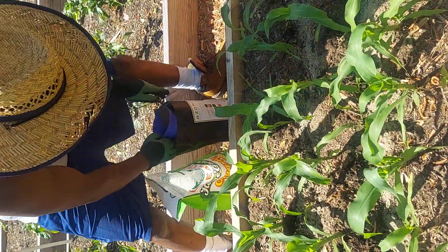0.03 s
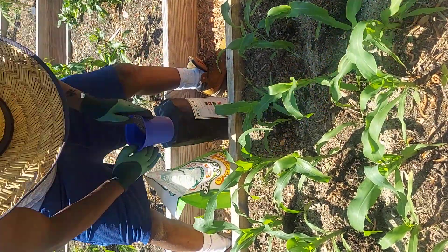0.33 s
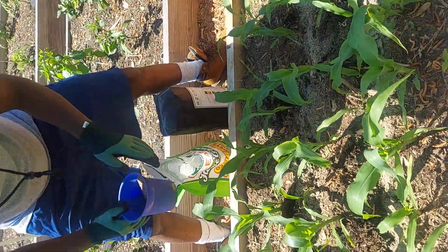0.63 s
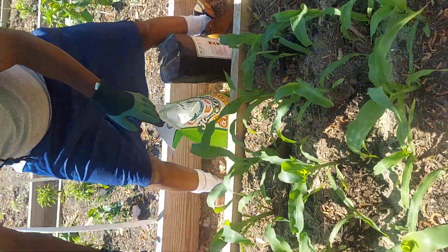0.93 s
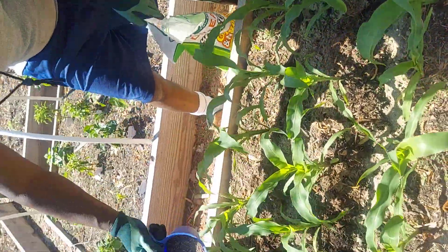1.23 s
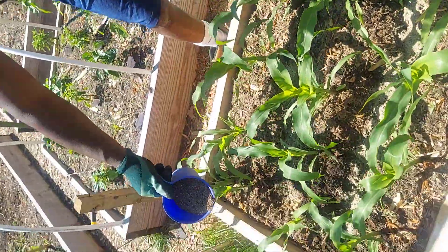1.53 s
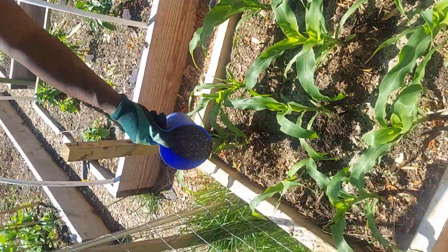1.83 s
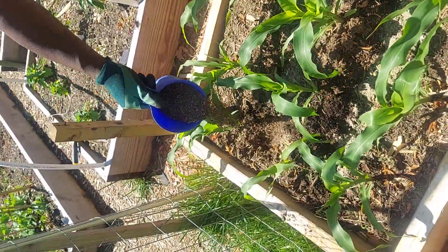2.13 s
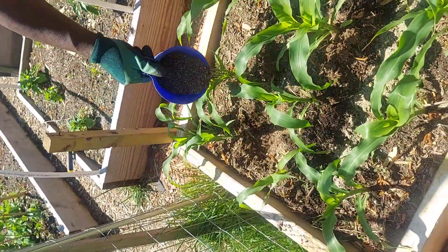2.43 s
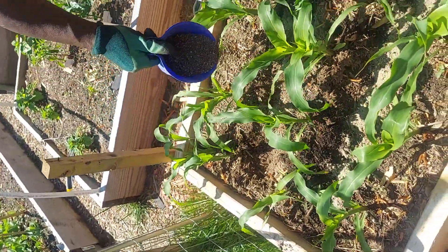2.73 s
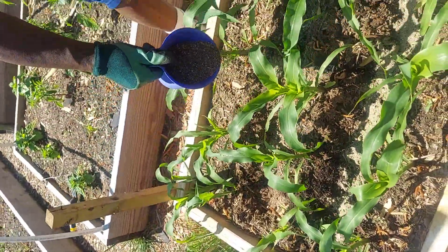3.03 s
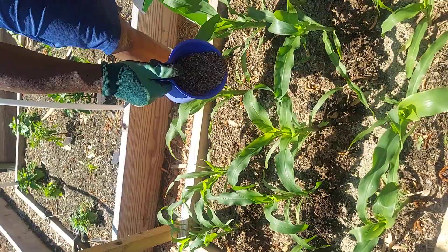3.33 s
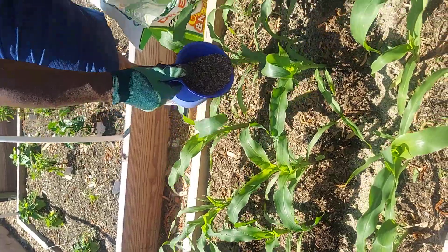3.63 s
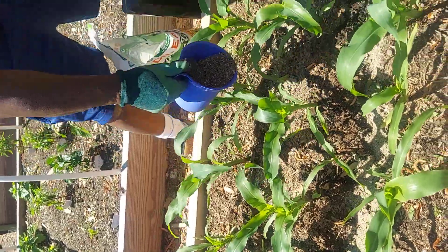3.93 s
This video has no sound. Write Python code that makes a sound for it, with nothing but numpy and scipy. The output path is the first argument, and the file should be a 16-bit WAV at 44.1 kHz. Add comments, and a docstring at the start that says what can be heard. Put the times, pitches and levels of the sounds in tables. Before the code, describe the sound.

Fertiliser granules are scooped with a plastic pot that knocks, then, after a few dull steps, shaken over soil and leaves in short hissing spills. Outdoors, wind buffets the microphone, a distant machine hums and birds chirp faintly.

```python
"""First a gardener scoops fertiliser granules from a bag: a plastic pot slides through them and knocks.
At about 1 s come dull steps along a raised bed, while loose granules shift in the carried pot.
From about 1.8 s the pot is shaken over soil and leaves: the granules slide out in short hissing spills,
and single ones tick on the leaves. Small birds chirp far off from 1.2 s to just after 3 s.
All the while a distant machine hums and wind buffets the microphone's two openings, its ports."""
import sys
import numpy as np
from scipy import signal
from scipy.fft import rfft, irfft
from scipy.io import wavfile
from scipy.ndimage import map_coordinates

SR = 44100
rng = np.random.default_rng(int(sys.argv[2]) if len(sys.argv) > 2 else 0)


def to_wav(sig):
    """Store sig (one row per channel, or 1-D mono) as 16-bit WAV at the path in sys.argv[1].

    Samples outside -1..1 are clipped; the rate is SR.
    """
    pcm = np.clip(np.atleast_2d(sig), -1, 1) * 32767
    pcm = np.round(pcm).astype(np.int16)
    wavfile.write(sys.argv[1], SR, pcm.T)  # frames by channels


N = 176400
T = np.arange(N) / SR
FREQS = np.maximum(np.arange(N // 2 + 1) * SR / N, 1)  # the frequencies of a spectrum, in Hz
SIDES = np.array([[1], [-1]])  # pushes left and right in opposite directions


def from_db(db):
    """Turn decibels into a number to multiply by."""
    return 10 ** (np.asarray(db) / 20)


def unit_power(x):
    """Scale a sound so that its average power is 1."""
    return x / np.sqrt(np.mean(x ** 2) + 1e-20)


def level(rows):
    """Join rows of seconds and dB into a volume curve."""
    return from_db(np.interp(T, *np.transpose(rows)))


def at_hz(rows):
    """Read a table at every frequency, giving each octave equal room."""
    hz, values = np.transpose(rows)
    return np.interp(np.log(FREQS), np.log(hz), values)


def pan(db):
    """Left and right volumes. Pan is how many dB louder the left side is."""
    return from_db(SIDES * db / 2)


def white():
    """Two unrelated hisses."""
    return rng.standard_normal((2, N))


def drift(rate_hz):
    """A smooth random wobble, about 1 in size."""
    step, warm_up = 40, 2000
    r = np.exp(-2 * np.pi * rate_hz * step / SR)
    noise = rng.standard_normal(N // step + warm_up + 2)
    slow = signal.lfilter([1], [1, -2 * r, r * r], noise)[warm_up:]
    return np.interp(np.arange(N) / step, np.arange(len(slow)), unit_power(slow))


def colour(x, spectrum, likeness=((1, 0),), balance=((1, 0),)):
    """Shape two unrelated noises into stereo: their tone, how alike the sides are, and their pan."""
    low_cut = 1 + (spectrum[0][0] / FREQS) ** 8
    high_cut = 1 + (FREQS / spectrum[-1][0] / 1.3) ** 8
    gain = from_db(at_hz(spectrum)) / np.sqrt(low_cut * high_cut)
    alike = at_hz(likeness)
    mid, side = rfft(x) * gain
    stereo = np.sqrt(1 + alike) * mid + np.sqrt(1 - alike) * side * SIDES
    return unit_power(irfft(stereo * pan(at_hz(balance)), N))


def envelope(start, attack, hold, release):
    """A volume curve that rises in a straight line and dies away from `hold` seconds after the start."""
    rise = np.clip((T - start) / attack, 0, 1)
    return rise * np.exp(-np.clip((T - start - hold) / release, 0, 40))


def resonate(x, hz, width_hz):
    """Make a noise ring around one pitch."""
    r = np.exp(-np.pi * width_hz / SR)
    return unit_power(signal.lfilter([1, 0, -1], [1, -2 * r * np.cos(2 * np.pi * hz / SR), r * r], x))


def even(x):
    """Even out the loudness of a noise so that it has fewer deep dips."""
    wave = signal.hilbert(x)
    return unit_power(wave.real / np.sqrt(np.abs(wave) ** 2 + .2))


# The tone of the open air. Each row: frequency in Hz, relative strength in dB.
AIR_TONE = [(50, -2), (65, -0.5), (125, -6.5), (165, -7), (190, -15.5), (245, -12), (320, -20),
            (440, -18.5), (620, -21), (800, -24), (1000, -22.5), (1600, -27), (3000, -32), (5000, -38.5),
            (6200, -45.5), (8500, -46.5), (10000, -53), (13000, -49), (15600, -70)]
# How alike the sides are. Each row: frequency in Hz, likeness (1 same, 0 unrelated, -1 opposite).
AIR_LIKENESS = [(100, 0.56), (300, 0.57), (650, 0.56), (1300, -0.28), (2500, -0.18), (5000, -0.085),
                (12000, -0.084)]
# Which way the air's sound leans. Each row: frequency in Hz, pan in dB.
AIR_PAN = [(200, 0), (1200, 0.5), (2800, -4), (5000, 2), (9000, 4), (13000, -8)]
def outdoor_air():
    """Distant outdoor sounds blend into a soft, steady wash."""
    return from_db(-39) * colour(white(), AIR_TONE, AIR_LIKENESS, AIR_PAN)


# The notes in the hum. Each row: pitch in Hz, base level in dB.
HUM_NOTES = [(123.6, -40), (154, -42.5), (245.5, -52), (276, -75), (489, -61), (593, -66.5)]
# The hum swells and sinks. Each row: time in seconds, change of level in dB.
HUM_SWELL = [(0, 2.5), (.27, -4.5), (.45, 1), (1.1, -2), (1.3, 2), (1.6, -7.5), (1.9, 2), (2.4, -1),
             (3.4, 0), (4, -1)]
def machine():
    """A far machine hums a few low notes, each wavering in pitch and loudness."""
    out = 0
    for hz, db in HUM_NOTES:
        phase = 2 * np.pi * hz * T + 0.78 * drift(2) + 0.085 * drift(0.33) * SIDES
        waver_db = 3 * drift(3.4)
        out += np.sqrt(2) * level(HUM_SWELL) * from_db(db + waver_db) * np.sin(phase)
    return out


# Bird calls. Each row: start and length in seconds, first and last pitch in Hz, relative level in dB.
CHIRPS = [(1.236, 0.28, 3720, 3520, -67), (1.486, 0.058, 3350, 3710, -66), (1.53, 0.06, 3150, 3180, -66),
          (1.99, .04, 2950, 2470, -61.5), (2.143, 0.057, 4290, 3480, -62.5), (2.227, .06, 3730, 2730, -63),
          (2.472, 0.058, 2800, 2724, -58), (2.745, .04, 2650, 2380, -61), (2.89, .035, 2650, 2360, -67),
          (2.599, 0.027, 5170, 4780, -60), (2.625, 0.023, 5180, 4920, -64), (2.697, 0.042, 4560, 3610, -61),
          (2.861, 0.025, 2910, 2890, -60), (2.99, 0.017, 4530, 4660, -62), (3.045, 0.039, 3020, 2650, -62),
          (3.087, 0.026, 3740, 3570, -64)]
def birds():
    """Far birds whistle short sliding notes, blurred by scattered echoes."""
    song, warble_hz = 0, 90 * drift(70)
    for start, length, first_hz, last_hz, db in CHIRPS:
        progress = np.clip((T - start) / length, 0, 1)
        hz = first_hz + (last_hz - first_hz) * progress + warble_hz
        song += from_db(db) * np.sin(np.pi * progress) * np.sin(2 * np.pi * np.cumsum(hz) / SR)
    fade_s = 0.055
    tail = white()[:, :SR // 2] * np.exp(-T[:SR // 2] / fade_s) / np.sqrt(fade_s * SR / 2)
    echoes = signal.fftconvolve(song[None], tail, axes=1)[:, :N]
    return pan(-3) * (from_db(6) * song + from_db(8) * echoes)


# Puffs of wind. Each row: middle in seconds, peak level in dB, width in seconds, pitch in Hz,
# port (0 left, 1 right).
BUFFETS = [(0.059, -40, 0.15, 124, 0), (0.834, -25, 0.03, 107.4, 0), (0.878, -19.5, 0.022, 75, 0),
           (0.952, -17, 0.015, 109, 0), (.951, -30.5, 0.0079, 270, 0), (1.421, -16, 0.0098, 113, 0),
           (1.822, -30, 0.026, 99, 0), (2.0, -19, 0.022, 85, 0), (2.036, -24, .024, 129, 0),
           (2.016, -22.5, 0.067, 93.8, 1), (2.107, -23, 0.018, 70, 0), (2.203, -19, 0.01, 91, 1),
           (2.171, -33, 0.01, 198, 1), (2.23, -27, 0.015, 168, 0), (2.314, -30, 0.053, 76.5, 1),
           (2.459, -29.5, 0.0135, 209, 1), (2.471, -24.5, 0.032, 111, 1), (2.643, -23, 0.02, 110, 0),
           (2.644, -19.5, 0.014, 124, 1), (2.766, -30.5, 0.062, 81.3, 0), (2.86, -28, 0.021, 100, 1),
           (2.879, -16, 0.013, 130, 0), (2.929, -18.5, 0.012, 103, 0), (3.006, -25.5, 0.05, 89, 0),
           (3.036, -31.5, 0.019, 179, 1), (3.057, -21.5, 0.025, 118.6, 1), (3.189, -22, 0.016, 113, 1),
           (3.229, -16.5, 0.012, 117, 1), (3.24, -18, 0.01, 184, 1), (3.247, -30.5, 0.088, 58, 1),
           (3.37, -27, 0.031, 106, 0), (3.635, -30.5, 0.04, 122, 0), (3.652, -26.5, 0.028, 98, 1)]
# The breeze rises and falls. Each row: time in seconds, level in dB.
BREEZE_LEVEL = [(0, -34.5), (.3, -44.5), (.7, -43.5), (.88, -33), (1.1, -39), (1.6, -40.5), (1.85, -40.5),
                (2.05, -32), (2.5, -33), (3.2, -33), (3.5, -41.5), (3.8, -36), (4, -41)]
# The tone of its rumble. Each row: frequency in Hz, relative strength in dB.
BREEZE_TONE = [(33, -19), (42, -11.5), (54, 1.5), (85, 0), (140, -7.5), (220, -21), (400, -40)]
def wind():
    """A breeze rumbles, and brief swirls of air each shake one port for a few uneven swings."""
    swirls, wander = np.zeros((2, N)), 1.01 * drift(32.9)
    for middle, db, width, hz, port in BUFFETS:
        near = np.abs(T - middle) < 3 * width
        t = T[near] - middle
        swing = np.sqrt(2) * np.sin(2 * np.pi * (hz * t + rng.random()) + wander[near])
        swell = np.exp(-2 * np.log(2) * (t / width) ** 2)
        swirls[port, near] += from_db(db) * swell * swing
    rumble = colour(white(), BREEZE_TONE, likeness=[(50, 0.077), (200, 0.15)])
    return swirls + level(BREEZE_LEVEL) * rumble


# Dull bumps. Each row: start in seconds, crunch level in dB, fade in seconds, thud pitch in Hz,
# dB by which the thud is louder than the crunch.
KNOCKS = [(.252, -41, .0075, 470, -0.5), (.258, -33, 0.0042, 546, -2.5), (0.274, -46, 0.015, 560, -8),
          (0.286, -45.5, 0.02, 516, 1.5), (0.954, -55, 0.0052, 406, 11.5), (0.975, -56.5, 0.011, 483, 10),
          (1.202, -39, 0.0099, 453, 1.5)]
# The tone of the crunch. Each row: frequency in Hz, relative strength in dB.
CRUNCH_TONE = [(400, 2), (620, 5.5), (850, -12), (1100, 2.5), (1500, -1.5), (2800, -3), (4500, -15),
               (7000, -33)]
def knocks_and_steps():
    """The pot bumps the bag and feet land: each is a crunch over a hollow thud that dies fast."""
    crunch = even(colour(white(), CRUNCH_TONE, likeness=[(600, 0.81), (3000, 0.29)]))
    out, noise, rise_s = 0, white()[0], 0.00074
    for start, db, fade, hz, thud_db in KNOCKS:
        ring = even(resonate(noise, hz, width_hz=57))
        thud = from_db(thud_db) * ring * envelope(start, 2 * rise_s, fade, fade)
        out += from_db(db) * (thud + crunch * envelope(start, rise_s, 2 * rise_s, fade))
    return out


# Single granules landing. Each row: start in seconds, level in dB, ring pitch in Hz, pan in dB.
TICKS = [(.05, -47, 2700, -19), (.47, -55.5, 7000, 2), (.865, -54, 13000, 3), (1.012, -59, 12500, 5),
         (1.07, -59, 12500, 3), (1.185, -49, 4000, -2), (1.335, -37.5, 4770, 0.5), (1.457, -45, 4350, 4),
         (1.767, -39, 7100, 1), (1.83, -54, 12900, 5), (2.271, -49, 7440, 3), (2.368, -42.5, 4900, 0),
         (2.397, -36, 12500, -4), (2.429, -40, 8000, 3), (2.451, -41, 10400, -1), (2.609, -50, 13000, 6),
         (3.529, -49, 8000, -3), (3.627, -47, 7500, -2), (3.681, -46, 5500, -7), (3.761, -31, 11900, -4),
         (3.774, -43.5, 2200, 3), (3.793, -45, 5000, -4), (3.842, -43, 8300, 1), (3.924, -44, 10900, -8)]
# The tone of their crack. Each row: frequency in Hz, relative strength in dB.
CRACK_TONE = [(2000, 4), (5000, 12.5), (8000, -16), (13000, 8), (15600, -11)]
def ticks():
    """A granule hits a leaf or the pot with a tiny crack and a brief ring."""
    out, noise, crack = 0, white(), colour(white(), CRACK_TONE)
    for start, db, hz, pan_db in TICKS:
        hit = resonate(noise, hz, width_hz=1140) + from_db(-5) * crack
        shape = envelope(start, attack=0.0015, hold=0.0015, release=0.0024)
        out += from_db(db) * pan(pan_db) * shape * hit
    return out


def grains(per_s, spread_db):
    """Tiny random hits in clumps, many weak and a few strong, scattered by leaves on their way."""
    big_per_s, big_db, direct_share, scatter_step_hz = 160, 9.5, 0.86, 663
    size_db = spread_db * np.minimum(rng.exponential(1, N), 4)
    clump_db = 0.45 * drift(55)
    small, big = rng.random((2, N)) < np.array([[per_s], [big_per_s]]) / SR
    hits = small * from_db(size_db + clump_db) + big * from_db(big_db)
    clicks = hits * rng.choice([-1, 1], (3, N))  # one direct copy, and a scattered one for each side
    # Each frequency reaches the two ports a little out of step.
    phase = np.interp(FREQS / scatter_step_hz, np.arange(64), rng.standard_normal(64))
    direct = irfft(rfft(clicks[0]) * np.exp(.5j * phase * SIDES), N)
    return np.sqrt(direct_share) * direct + np.sqrt(1 - direct_share) * clicks[1:]


# Which way the granules' hiss leans. Each row: frequency in Hz, pan in dB.
SHOWER_PAN = [(3000, -5), (5000, -3), (9000, 3), (13000, 1.5)]
def shower(tone, per_s, spread_db):
    """Thousands of hits merge into a hiss with the tone of whatever they strike."""
    left, right = grains(per_s, spread_db)
    return colour(np.array([left + right, left - right]), tone, balance=SHOWER_PAN)


# How far the pot's sound is out of step. Each row: frequency in Hz, the left port's lead in radians.
PORT_PHASE = [(3000, -.7), (5000, 0), (7000, -0.5), (9000, -.9), (10000, 1), (11400, -0.5), (12200, 3.5),
              (13500, 3.5), (14500, 4.5), (15800, 10)]
# The pot's direction. Each row: time in seconds, extra delay at the left port in seconds.
POT_LAG = [(0, -1.15e-4), (.35, -1.15e-4), (1.85, -1.4e-5), (2.35, 0), (2.85, 4e-6), (3.2, 3.4e-5),
           (4, 3.3e-5)]
def from_pot(x):
    """The pot's sound reaches one port a moment before the other, depending on where the pot is."""
    left, right = irfft(rfft(x) * np.exp(.5j * at_hz(PORT_PHASE) * SIDES), N)
    lag = np.interp(T, *np.transpose(POT_LAG))
    shifted_right = map_coordinates(right, [(T + lag) * SR], order=5, mode="mirror")
    return np.array([left, shifted_right])


# The scoop builds up, then drops away. Each row: time in seconds, level in dB.
SCOOP_LEVEL = [(0, -50), (.04, -57), (.11, -52.5), (.2, -49), (.288, -40.5), (.303, -61.5), (.45, -67),
               (.7, -83)]
# The tone of the scoop. Each row: frequency in Hz, relative strength in dB.
SCOOP_TONE = [(1500, 5), (2900, 0.5), (4400, 2.5), (6000, -3), (8500, -3.5), (10400, -11), (13200, -1.5),
              (15600, -11)]
def scoop():
    """The pot slides out through the granules in the bag with a dense rustle."""
    return level(SCOOP_LEVEL) * shower(SCOOP_TONE, per_s=4800, spread_db=1.5)


# The rustle inside the pot. Each row: time in seconds, level in dB.
TRICKLE_LEVEL = [(0, -87), (.81, -73), (.87, -63), (1.2, -62.5), (1.4, -64), (1.6, -74), (1.77, -70),
                 (1.82, -77), (2.05, -59), (2.4, -56.5), (2.62, -57), (2.86, -55), (2.95, -62.5),
                 (3.1, -60.5), (3.19, -56.5), (3.27, -63.5), (3.55, -64), (3.83, -52), (3.87, -62),
                 (3.94, -59), (4, -56)]
# The tone of that rustle. Each row: frequency in Hz, relative strength in dB.
TRICKLE_TONE = [(3000, -3), (5000, -12), (8000, -6), (10000, -15), (12000, -3.5), (13400, .5), (15600, -6)]
def trickle():
    """Loose granules shift softly against each other in the carried pot."""
    return level(TRICKLE_LEVEL) * pan(-1.5) * shower(TRICKLE_TONE, per_s=3100, spread_db=3.5)


# Shakes of the pot. Each row: start, rise, length and fade in seconds, level in dB, pan in dB,
# tilt towards the high notes in dB per octave.
SPILLS = [(1.782, 0.022, 0.15, .02, -53.5, -2, 0.5), (1.928, 0.049, 0.049, .025, -47.5, 1, 0.5),
          (2.09, 0.027, 0.049, 0.018, -47, 0, 1.5), (2.16, 0.03, 0.065, .015, -54, 1, -1),
          (2.293, .008, 0.015, 0.013, -45.5, 1, 0.5), (2.328, 0.032, 0.14, 0.028, -48.5, 0, 0.5),
          (2.366, 0.0027, 0.035, .01, -40, -0.5, 2), (2.44, .008, .018, 0.02, -44.5, 1, 1),
          (2.731, 0.027, 0.14, 0.021, -49.5, -3, 5), (3.36, .02, 0.053, 0.039, -56, -6, 7),
          (3.481, .01, 0.027, 0.1, -47.5, -3, 4.5), (3.562, 0.078, 0.19, .045, -45, -4, 0),
          (3.669, 0.0066, 0.023, 0.015, -35, 1, 0), (3.693, .015, 0.091, 0.005, -38, -1.5, 2)]
# The tone of a spill before tilting. Each row: frequency in Hz, relative strength in dB.
SPILL_TONE = [(1200, 2.5), (2400, -4), (3000, 1.5), (4000, -0.5), (4900, 2), (6400, 0.5), (8200, 3.5),
              (9900, -2.5), (10900, 0), (12000, 1.5), (13400, 7.5), (14600, 4), (15800, 0)]
def spills():
    """Each shake sends a short, hissing shower of granules over soil and leaves."""
    out, pivot_hz = 0, 10000
    for start, rise, length, fade, db, pan_db, tilt in SPILLS:
        tone = [(hz, strength + tilt * np.log2(hz / pivot_hz)) for hz, strength in SPILL_TONE]
        hiss = shower(tone, per_s=2400, spread_db=1.5)
        out += from_db(db) * pan(pan_db) * envelope(start, rise, length, fade) * hiss
    return out


def scene():
    """All the sounds of the garden add up at the microphone."""
    granules = from_pot(scoop() + trickle() + spills())
    return outdoor_air() + machine() + birds() + wind() + knocks_and_steps() + ticks() + granules


# The two ports ring differently. Each row: frequency in Hz, pan in dB.
PORT_PAN = [(6500, -0.5), (8000, -6), (9400, -2.5), (10800, 5), (12200, 4), (13700, 3.5), (15200, 5)]
def record(dry):
    """Each port colours the high notes its own way; the deepest rumble and highest hiss are cut."""
    coloured = irfft(rfft(dry) * pan(at_hz(PORT_PAN)), N)
    rumble_cut = signal.butter(4, 28, "high", fs=SR, output="sos")
    hiss_cut = signal.ellip(12, .1, 80, 15850, fs=SR, output="sos")
    return signal.sosfilt(hiss_cut, signal.sosfilt(rumble_cut, coloured))


dry = scene()
out = record(dry)
to_wav(out)
```